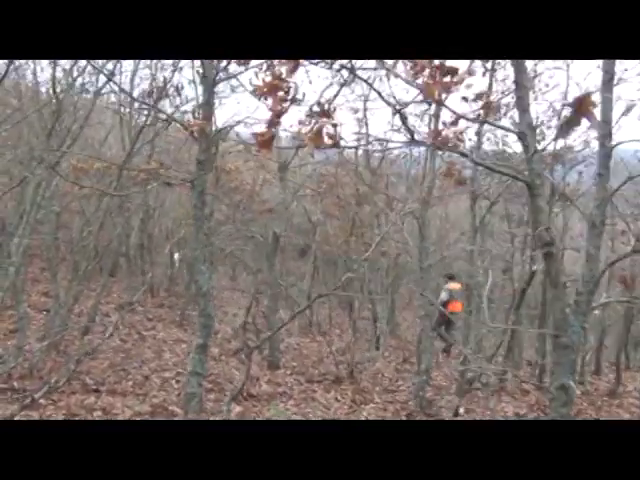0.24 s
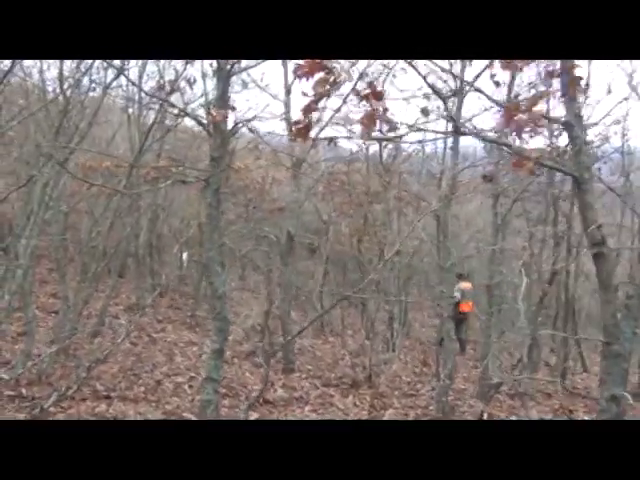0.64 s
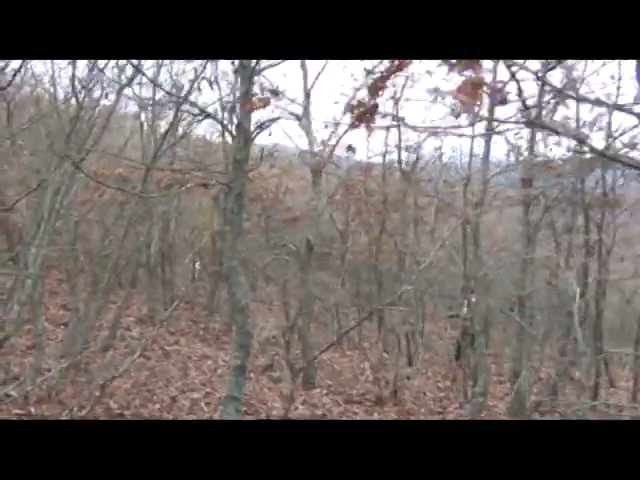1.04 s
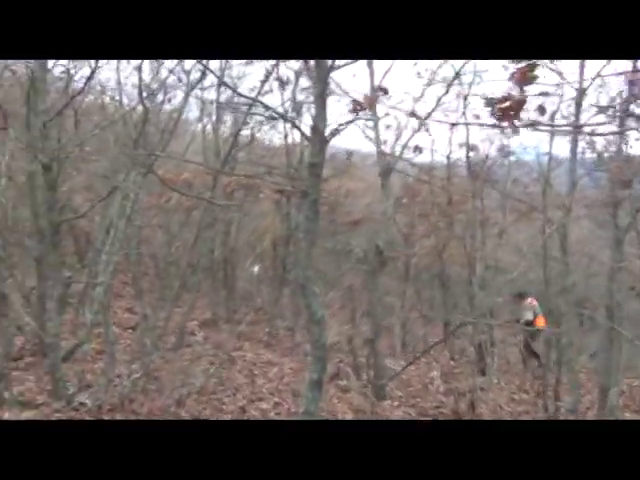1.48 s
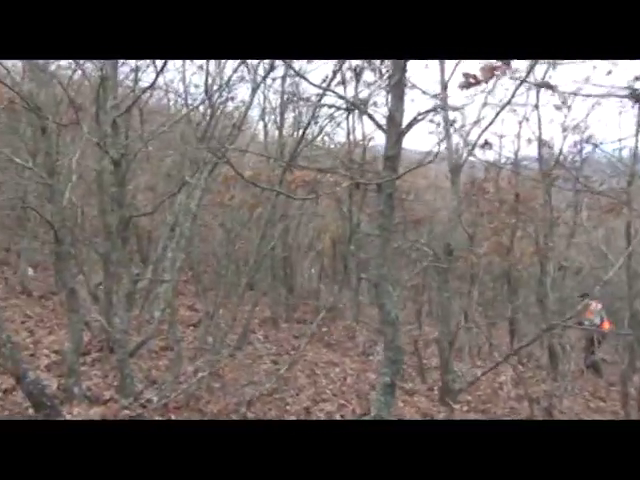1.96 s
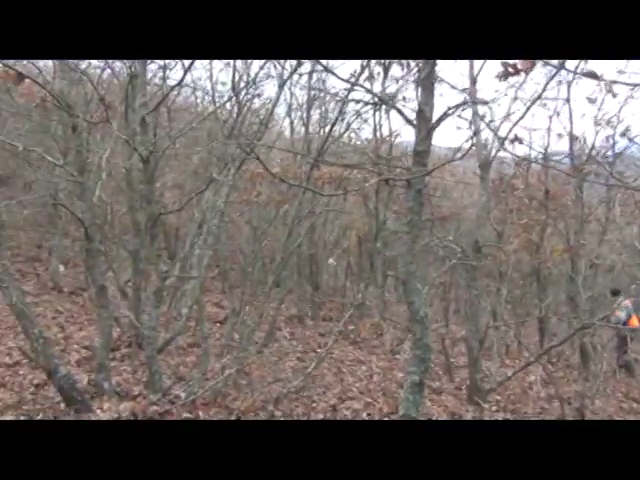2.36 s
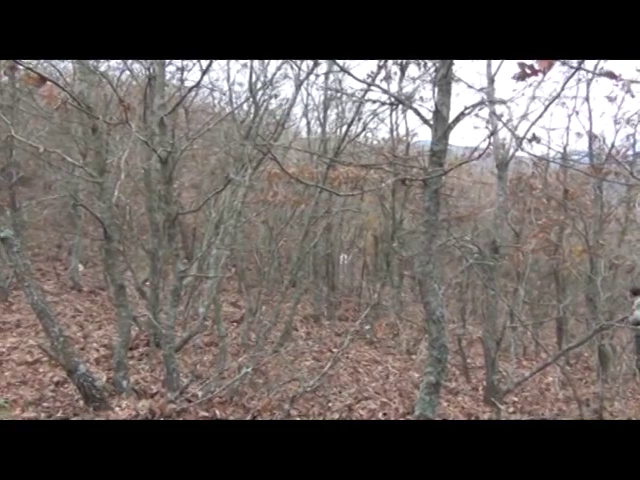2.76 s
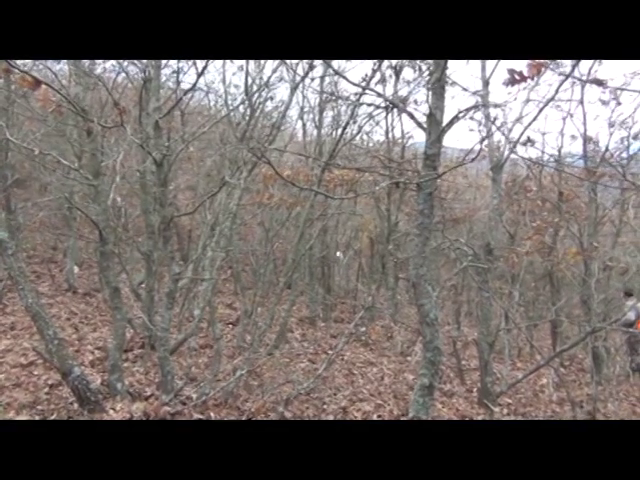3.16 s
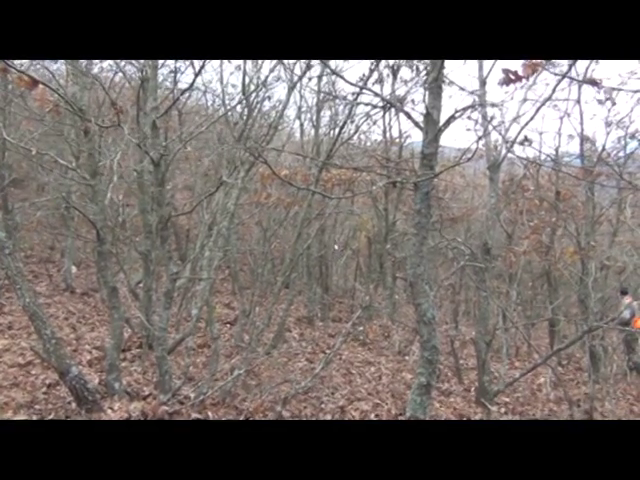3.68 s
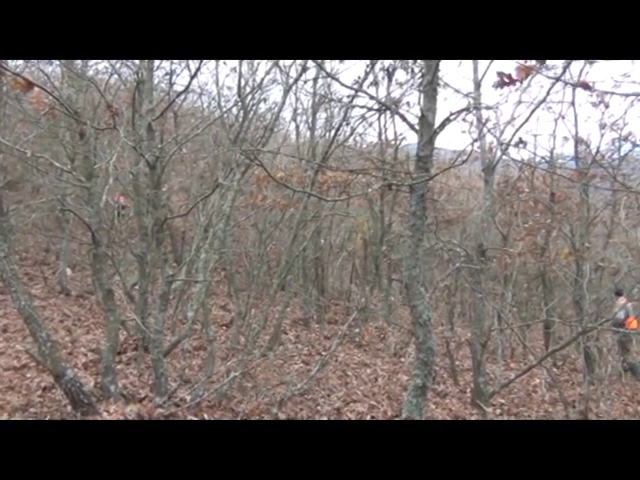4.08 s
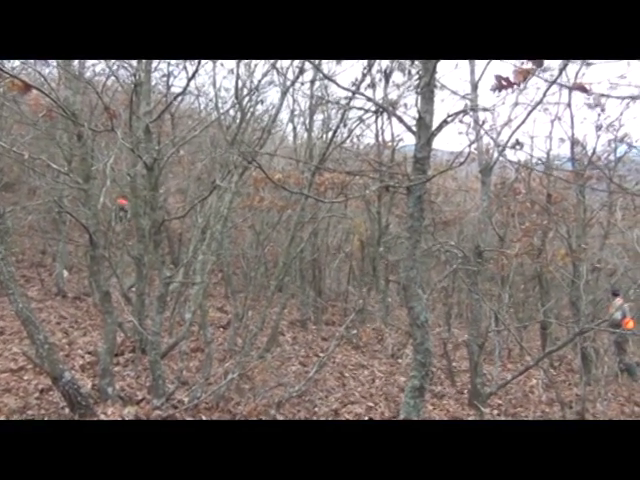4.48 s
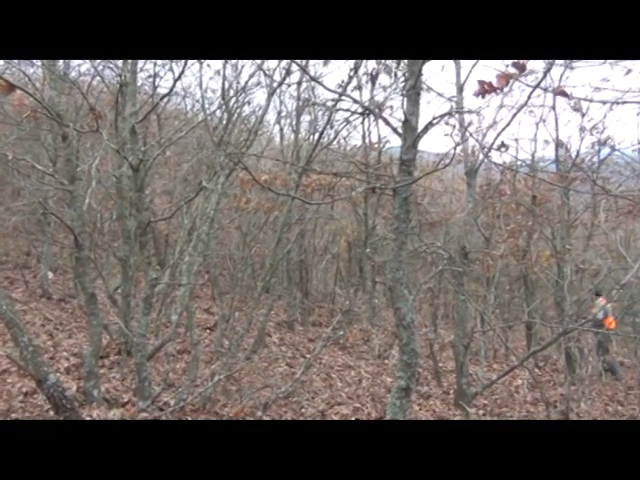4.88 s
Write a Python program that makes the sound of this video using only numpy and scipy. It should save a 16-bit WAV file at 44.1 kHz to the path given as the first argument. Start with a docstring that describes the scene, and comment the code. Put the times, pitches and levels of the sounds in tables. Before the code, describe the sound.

Close footsteps crackle through dry woodland leaves and stop; a distant dog rustles through the brush, its little bells clinking unevenly.

```python
"""Three slow steps crush dry leaves close by, on a wooded slope; twigs snap and a stick creaks.
The walker stands still; further off a dog rustles through the brush, clappers clanking in the two
small bells on its collar. A bird whistles a few notes over a steady hush.
Trunks scatter the snaps, bells and whistles back as echoes."""
import sys
import numpy as np
from scipy import signal
from scipy.fft import rfft, irfft
from scipy.io import wavfile
from scipy.ndimage import uniform_filter1d

SR = 44100
rng = np.random.default_rng(int(sys.argv[2]) if len(sys.argv) > 2 else 0)


def wav_out(sig):
    """Save sig, one row per channel (or a flat mono array), as 16-bit PCM at SR to the path in sys.argv[1]."""
    wavfile.write(sys.argv[1], SR, np.round(np.clip(np.atleast_2d(sig).T, -1, 1) * 32767).astype(np.int16))


N = 226193
TIME = np.arange(N) / SR
# left-right likeness of distant sound: f/Hz, coherence
FAR_COHERENCE = [(40, .95), (100, .93), (300, .8), (700, .68), (1500, .72), (4000, .72), (8000, .66),
                 (14000, .66)]


def steps(crackle_db=-0.55, brittle_db=-8, crunch_db=-5.5, scuff_db=-12, stir_db=-40, stir_end_s=1.97):
    """Top leaves crackle, the packed layer crunches, the sole scuffs, the mould takes the weight."""
    # footfalls: touchdown t/s, load time/s, leaf level/dB, thud level/dB
    footfalls = [(-0.025, 0.34, -24.5, -48), (0.826, 0.28, -20.5, -35), (1.608, 0.3, -25.5, -57)]
    # weight shifts: peak t/s, width/s, thud level/dB, scuff level/dB, leaf level/dB
    shifts = [(0.09, 0.066, -52, -37, -34), (0.446, 0.073, -40.5, -33, -40),
              (0.645, 0.067, -47, -48.5, -38.5), (0.795, 0.037, -36.5, -34, -37),
              (1.22, 0.093, -40, -34.5, -31.5), (1.43, 0.041, -42.5, -43, -41),
              (1.543, 0.039, -38.5, -39, -38), (1.673, 0.033, -36, -40, -28.5)]
    # layer spectra: f/Hz, relative level/dB
    crackle_spectrum = [(60, -66), (1500, -26), (3000, -13), (4500, -1), (6500, -1), (9500, 0), (12000, -5),
                        (14000, -10.5), (16000, -18.5)]
    crunch_spectrum = [(60, -63), (600, -11), (1200, -2.5), (2000, 0), (3200, -2.5), (4500, -8.5),
                       (7000, -3), (15000, -61)]
    scuff_spectrum = [(40, -31), (250, -21), (500, -1.5), (750, 1.5), (1100, 1.5), (1600, -1), (3000, -5),
                      (10000, -57)]
    thud_spectrum = [(20, -30), (70, -21.5), (130, -10), (250, 0), (400, 1.5), (600, 1), (1200, -11.5),
                     (5000, -60)]
    # left-right likeness at the feet: f/Hz, coherence
    near = [(100, .994), (400, .993), (1000, .975), (2000, .95), (4000, .86), (8000, .66), (14000, .66)]
    # trodden leaves spring back until the walker stands still
    stir = gain_of(stir_db) * np.exp(-np.maximum(TIME - stir_end_s, 0) / 0.033)
    crush, press, slide, weight = stir ** 2, stir ** 2, np.zeros(N), np.zeros(N)  # power envelopes
    for s, load_s, leaf_db, thud_db in footfalls:
        load = gain_of(leaf_db) ** 2 * footfall(s, load_s, slope_db_per_s=0)
        press += load
        slide += load * gain_of(scuff_db) ** 2
        crush += gain_of(leaf_db) ** 2 * footfall(s, load_s, slope_db_per_s=15)  # roll on to the toe
        weight += gain_of(thud_db) ** 2 * footfall(s, load_s, slope_db_per_s=-12, release_db_per_s=19.5)
    for s, width_s, thud_db, slide_db, leaf_db in shifts:
        push = swell(s, width_s)
        weight += gain_of(thud_db) ** 2 * push
        slide += gain_of(slide_db) ** 2 * push
        press += gain_of(leaf_db) ** 2 * push
        crush += gain_of(leaf_db) ** 2 * push
    crackle = coloured(grains(per_s=7000, size_db=-0.5, ring_s=0.00017, clump_db=1.58, clump_s=0.024),
                       crackle_spectrum, near)
    brittle = coloured(grains(per_s=300, size_db=2, ring_s=0.0002, clump_db=4, clump_s=0.02),
                       crackle_spectrum, near)  # leaf veins crack singly
    crunch = coloured(grains(per_s=2000, size_db=0.4, ring_s=0.00044, clump_db=0.6, clump_s=0.013),
                      crunch_spectrum, near)
    scuff = coloured(grains(per_s=1200, size_db=2.5, ring_s=0.002, clump_db=1.2, clump_s=0.03),
                     scuff_spectrum, near)
    thud = coloured(grains(per_s=700, size_db=2, ring_s=0.003, clump_db=1, clump_s=0.04),
                    thud_spectrum, near)
    top = (crackle * gain_of(crackle_db) + brittle * gain_of(brittle_db)) * np.sqrt(crush)
    packed = crunch * gain_of(crunch_db) * np.sqrt(press) + scuff * np.sqrt(slide)
    return top * panned(db=3) + packed * panned(db=1.2) + thud * np.sqrt(weight)


def footfall(s, load_s, slope_db_per_s, release_db_per_s=69.5, press_s=0.032, lift_db=4, lift_s=0.0067):
    """Power of one step: pressed in, held on a slope, dropping as the foot lifts, dying away."""
    t = TIME - s
    held_db = slope_db_per_s * (np.clip(t, 0, load_s) - load_s / 2)
    lifted_s = np.maximum(t - load_s, 0)
    fall_db = lift_db * np.minimum(lifted_s / lift_s, 1) + release_db_per_s * lifted_s
    return (np.clip(t / press_s, 0, 1) * gain_of(held_db - fall_db)) ** 2


def grains(per_s, size_db, ring_s, clump_db, clump_s, leaves=16):
    """Clumps of tiny fractures; each leaf answers with its own short burst."""
    window = np.hanning(int(clump_s * SR) + 3)
    clumps = evened(signal.oaconvolve(rng.standard_normal(N), window, "same"))
    sizes = gain_of(size_db * np.minimum(rng.exponential(1, N), 4) + clump_db * np.clip(clumps, -2, 2))
    clicks = sizes * rng.choice([-1, 1], N) * (rng.random(N) < per_s / SR)
    leaf = rng.integers(0, leaves, N)
    bursts = rng.standard_normal((leaves, 2, 512)) * np.exp(-TIME[:512] / ring_s)
    return sum(signal.oaconvolve((clicks * (leaf == k))[None], bursts[k], axes=1)[:, :N]
               for k in range(leaves))


def snaps(splinter_db=-17, splinter_s=0.0021, echo_db=-15):
    """A twig or stalk breaks in a few sharp cycles, then splinters briefly. The bright click at 2.6006 s is no
    twig: it is the clapper's tick on the hardest bell stroke."""
    # breaks (and, at 2.6006 s, the clapper's tick on a hard bell stroke): t/s, level/dB, f/Hz, decay/s
    breaks = [(0.1211, -8, 5080, .0002), (0.165, 0, 4290, .0003), (0.3914, -10, 5940, .0002),
              (0.5651, -13, 7060, .0003), (0.6145, -20, 7210, .0002), (0.7637, -13, 7240, .0004),
              (1.0924, -2, 8700, .0003), (1.1074, -6, 7750, .0002), (1.1194, -6, 6840, .0002),
              (1.3498, -16, 9260, .0002), (1.4406, -18, 9000, .0002), (1.5209, -11.5, 6150, .0003),
              (1.6152, -11.5, 9200, .0003), (1.8547, -7, 6680, .0002), (1.9475, -6, 9430, .0003),
              (1.9849, -6, 8000, .0005), (2.0283, -15, 4370, .0003), (2.6006, -14, 9700, .002),
              (2.8364, -27, 4330, .0003), (3.2311, -25, 3190, .0012), (3.2315, -20, 9300, .0005),
              (3.8028, -26, 7700, .0003), (4.5526, -31, 6380, .0003)]
    out, t = np.zeros((2, N)), TIME[:600]
    for s, db, hz, ring_s in breaks:
        crack = np.sin(2 * np.pi * hz * t) * np.exp(-t / ring_s)
        splinters = rng.standard_normal((2, len(t))) * np.exp(-t / splinter_s)
        add(out, s, gain_of(db) * panned(db=2.3) * (crack + gain_of(splinter_db) * splinters))
    out = band(out, low_hz=1490, high_hz=13400)  # thin stalks radiate no bass
    return out + gain_of(echo_db) * woods(out.mean(0))


def knocks(gain_db=-3, ring_s=0.007, spread=0.3):
    """A soft blow sets off a cluster of quickly damped low resonances."""
    # soles and sticks hitting the ground: t/s, level/dB, f/Hz
    blows = [(0.778, -25, 788), (0.795, -15.5, 765), (0.854, -24, 652), (0.884, -19, 339),
             (0.929, -17, 540), (1.069, -13, 1223), (1.145, -19.5, 533), (1.244, -39, 910),
             (1.519, -46, 540), (1.661, -26, 346), (4.737, -30, 806)]
    out, t = np.zeros(N), TIME[:4000]
    for s, db, hz in blows:
        detune, phase = rng.standard_normal((2, 8, 1))
        ring = np.sin(2 * np.pi * (hz * np.exp(spread * detune) * t + phase)).sum(0)
        knock = ring * t / ring_s * np.exp(-t / ring_s)
        add(out, s, gain_of(db + gain_db) * knock / abs(knock).max())
    return out * panned(db=1.5)


def creak(gain_db=-1, width_hz=230, fade_s=0.011):
    """A boot drags over a stick: stick-slip excites one resonance that sinks and rises."""
    # path of the resonance: t/s, f/Hz, level/dB
    path = [(.375, 1748, -38), (.395, 1646, -28), (.425, 943, -40), (.452, 750, -44), (.485, 1046, -27),
            (.508, 800, -39), (.53, 674, -58)]
    s, hz, db = np.transpose(path)
    hz, db = np.interp(TIME, s, hz), np.interp(TIME, s, db)
    tone = (flutter((N,), width_hz) * np.exp(2j * np.pi * np.cumsum(hz) / SR)).real
    gate = np.exp(-abs(TIME - np.clip(TIME, s[0], s[-1])) / fade_s)
    return evened(tone) * gain_of(db + gain_db) * gate


def collar(echo_db=-8):
    """Two bells heard through the trees, the smaller a little to the right."""
    # clapper strokes: t/s, strength/dB, favoured f/Hz
    large_strokes = [(1.9554, -30, 2122), (1.9868, -24.5, 3100), (2.135, -30, 6550), (2.4214, -36, 2330),
                     (2.5672, -25, 2170), (2.6006, -9.5, 2260), (2.6797, -34, 11300), (2.803, -42, 1600),
                     (2.8225, -37.5, 4200), (2.8988, -39.5, 2420), (3.0382, -36, 2780),
                     (3.0853, -30.5, 2540), (3.1478, -34.5, 11300), (3.152, -31, 2740), (3.2159, -29, 1500),
                     (3.434, -40.5, 2300), (3.5868, -30, 4420), (3.6138, -29.5, 2500),
                     (3.6666, -34.5, 2330), (3.717, -29, 2150), (3.8028, -39, 7400), (3.916, -33, 2060),
                     (3.9903, -45, 6500), (4.0845, -37, 2450), (4.1257, -27.5, 2200), (4.128, -37.5, 11300),
                     (4.139, -22.5, 2160), (4.1764, -34, 2900), (4.215, -35, 4300), (4.4658, -33, 1700),
                     (4.591, -35.5, 1850), (4.6394, -38, 3400), (4.7007, -25.5, 2050), (4.788, -32, 2150),
                     (4.89, -28, 1850), (4.9142, -15, 2060), (5.0265, -27, 4300), (5.079, -38, 1500),
                     (5.1126, -37, 2290)]
    small_strokes = [(0.632, -38.5, 2930), (0.6866, -36.5, 2040), (0.723, -38, 2200), (1.4334, -36.5, 2820),
                     (1.5288, -35.5, 2100), (1.5658, -34, 2200), (1.7515, -36, 2700), (2.0272, -32.5, 1900),
                     (2.0826, -41, 2800), (3.339, -39.5, 1570), (3.898, -33.5, 3930), (4.139, -25.5, 2100),
                     (4.1883, -31, 4800), (4.306, -33, 2000), (4.662, -34.5, 2440), (4.7549, -24.5, 3070)]
    # bell modes: f/Hz, level re partial/dB, t60/s, extra loss once the clapper rests/dB
    large_modes = [(1487.6, 1, 0.12, 5), (1915, -26, 0.31, -4), (2140, -27.5, 0.23, 5),
                   (4053, -13.5, 0.16, -1), (4320, -2, 0.18, 8), (4410, -14.5, 0.2, -6),
                   (7360, -8, 0.18, 27), (7670, -9, 0.18, -13), (7770, -2.5, 0.16, 1),
                   (10900, -11.5, 0.033, 14), (11460, 3, 0.15, 9), (11900, -13, .2, 5),
                   (13450, -14, 0.22, 5)]
    small_modes = [(1567, 4.5, 0.15, 15), (2240, -21.5, 0.19, -5), (4830, -12, 0.25, 30),
                   (4860, -10, 0.55, 4.5), (8270, -5.5, 0.31, 28), (11900, -1, .25, 2)]
    large = bell(large_strokes, large_modes, partial_hz=[1380, 4620, 8300, 11300], gain_db=2.5)
    small = bell(small_strokes, small_modes, partial_hz=[1570, 4850, 8220, 12060], gain_db=1)
    direct = large * panned(db=0.8) + small * panned(db=-2)
    return direct + gain_of(echo_db) * woods(large + small) + woods(rattle())


def bell(strokes, modes, partial_hz, gain_db):
    """Each stroke ticks and rings the modes; the clapper chatters on the wall, then rests on it."""
    rise_s, free_s, settle_s = 0.0012, 0.031, 0.0071
    buzz_db, buzz_hz, buzz_s = -4, 330, 0.065
    tick_db, tick_s = -19, 0.011
    full_swing_db, scatter, vary_db = 3, 0.0042, 2
    loss_db_per_octave, max_loss_db = 14, 29
    out, t = np.zeros(N), TIME[:SR // 3]
    hz, mode_db, t60_s, damp_db = np.transpose(modes)[:, :, None]
    settled = (1 + np.tanh((t - free_s) / settle_s)) / 2
    decay = gain_of(mode_db - 60 * t / t60_s - damp_db * settled)
    chatter = flutter((len(modes), N), buzz_hz)
    nearest_partial = abs(hz - np.array(partial_hz)).argmin(1)
    for s, db, favoured_hz in strokes:
        detune, phase, luck = rng.standard_normal((3, len(modes), 1))
        hardness = gain_of(0.22 * (db - full_swing_db))  # soft strokes swell slower, chatter less
        buzz = hardness * gain_of(buzz_db) * (hz / partial_hz[1]) ** 0.94 * np.exp(-t / buzz_s)
        start = rng.integers(N - len(t))
        rough = (1 + buzz * chatter[:, start:start + len(t)]) / np.sqrt(1 + buzz ** 2)
        tone = (rough * np.exp(2j * np.pi * (hz * (1 + scatter * detune) * t + phase))).real
        ring = tone * decay * (1 - np.exp(-t * hardness / rise_s))
        tick = band(rng.standard_normal(len(t)) * np.exp(-t / tick_s), low_hz=6500, high_hz=14000)
        # the contact spot decides which partials speak
        loss_db = loss_db_per_octave * abs(np.log2(np.array(partial_hz) / favoured_hz))
        partial_db = db - np.minimum(loss_db - loss_db.min(), max_loss_db)
        jitter_db = (vary_db * luck * (mode_db < -3.2))[:, 0]  # weak modes only
        mode_gains = gain_of(partial_db[nearest_partial] + gain_db + jitter_db)
        add(out, s, mode_gains @ ring + hardness * gain_of(db + tick_db) * tick)
    return out


def rattle(level_db=-54, width_hz=90, fade_in_s=1.1):
    """Loose clappers roll in the bells and keep them faintly sounding."""
    # sustained bell tones: f/Hz, relative level/dB
    tones = [(1500, 4.5), (1575, -1.5), (2140, -5), (4350, 1), (4850, -7), (7650, -0.5), (8220, -5),
             (11400, -29)]
    hz, db = np.transpose(tones)[:, :, None]
    ring = (gain_of(db) * flutter((len(hz), N), width_hz) * np.exp(2j * np.pi * hz * TIME)).real.sum(0)
    return gain_of(level_db) * evened(ring) * np.clip(TIME / fade_in_s, 0, 1)


def dog(gain_db=-1):
    """Paws and flanks stir distant leaves; each swish comes quicker than it goes."""
    # swishes: peak t/s, width/s, level/dB
    swishes = [(2.113, 0.053, -46), (2.359, 0.029, -42), (2.45, 0.069, -42), (2.63, 0.066, -39.5),
               (2.79, 0.096, -45.5), (2.912, 0.043, -40.5), (3.204, 0.02, -40), (3.41, 0.024, -47),
               (3.63, 0.17, -42), (3.816, 0.013, -42), (3.876, 0.035, -40), (4.06, 0.11, -46.5),
               (4.166, 0.1, -47.5), (4.465, 0.022, -44.5), (4.72, 0.12, -45.5), (4.967, 0.16, -47.5)]
    # rustle spectrum: f/Hz, relative level/dB
    spectrum = [(700, -28), (1500, -7), (3000, 1.5), (5500, 0), (8000, 1.5), (10500, 3), (12500, -8),
                (16000, -16)]
    rustle = grains(per_s=9000, size_db=4.5, ring_s=0.00052, clump_db=3, clump_s=0.026)
    power = sum(gain_of(db) ** 2 * swell(s, width_s, rise_ratio=0.61) for s, width_s, db in swishes)
    return coloured(rustle, spectrum, FAR_COHERENCE) * np.sqrt(power) * gain_of(gain_db)


def bird(gain_db=1, waver=0.0065, echo_db=-6):
    """Pure whistles: a downward slur, two held steps, a soft fall."""
    # notes: t/s, length/s, first f/Hz, last f/Hz, first level/dB, last level/dB
    notes = [(2.23, 0.098, 2242, 2164, -56, -46), (2.30, 0.095, 2140, 1940, -43, -46),
             (2.375, 0.12, 2205, 2192, -39, -47), (2.485, 0.13, 2608, 2603, -38, -41),
             (2.62, 0.04, 2605, 2460, -34, -48), (2.68, 0.068, 2490, 2414, -50, -51)]
    out = np.zeros(N)
    for s, length_s, first_hz, last_hz, first_db, last_db in notes:
        n = int(length_s * SR)
        wobble = evened(uniform_filter1d(rng.standard_normal(N), size=300))[:n]
        hz = np.linspace(first_hz, last_hz, n) * (1 + waver * wobble)
        envelope = gain_of(np.linspace(first_db, last_db, n) + gain_db) * signal.windows.tukey(n, 0.2)
        add(out, s, envelope * np.sin(2 * np.pi * np.cumsum(hz) / SR))
    return out * panned(db=-8) + gain_of(echo_db) * woods(out)


def woods(x, build_s=0.0054, taps_per_s=2500):
    """Echoes from many trunks: sparse taps, each band dying at its own rate."""
    # echo decay: f/Hz, t60/s
    decay_times = [(200, 0.34), (1500, 0.49), (2500, 0.58), (4500, 0.32), (8000, 0.39), (15000, 0.067)]
    onset = 1 - np.exp(-TIME[:SR] / build_s)
    taps = rng.standard_normal((2, SR)) * (rng.random((2, SR)) < taps_per_s / SR) * onset
    hz, frame_s, frames = signal.stft(taps, SR, nperseg=256)
    decay = gain_of(-60 * frame_s / at_hz(decay_times, hz)[:, None])
    mid, side = signal.istft(frames * decay, SR, nperseg=256)[1]
    tail = np.array([mid + 0.14 * side, mid - 0.49 * side]) / np.linalg.norm(mid)
    return signal.fftconvolve(x[None], tail, axes=1)[:, :N]


def air(level_db=-47.5):
    """Steady hush of the wooded valley."""
    # hush spectrum: f/Hz, relative level/dB
    spectrum = [(15, -45), (30, -16), (60, -8.5), (130, -8), (600, -3), (1200, -4.5), (1500, 1.5),
                (1800, -6.5), (2150, -1.5), (2500, -8.5), (3300, -7.5), (5200, -7.5), (9000, -9.5),
                (16000, -14)]
    return gain_of(level_db) * coloured(rng.standard_normal((2, N)), spectrum, FAR_COHERENCE)


def coloured(pair, spectrum, coherence):
    """Gives two unrelated signals a spectrum and a left-right coherence; mid rms 1."""
    bins_hz = np.fft.rfftfreq(N, 1 / SR)
    a, b = rfft(pair)
    same = at_hz(coherence, bins_hz)
    mid, side = a * np.sqrt(1 + same), b * np.sqrt(1 - same)
    out = irfft(np.array([mid + side, mid - side]) * gain_of(at_hz(spectrum, bins_hz)), N)
    return out / out.mean(0).std()


def flutter(shape, width_hz):
    """Complex narrowband noise, rms 1."""
    real, imaginary = rng.standard_normal((2, *shape))
    z = signal.sosfilt(signal.butter(3, width_hz / 2, fs=SR, output="sos"), real + 1j * imaginary)
    return z / np.sqrt(np.mean(abs(z) ** 2))


def swell(s, width_s, rise_ratio=1):
    """Power hump at time s; rise_ratio is rise time over fall time."""
    return np.exp(-((TIME - s) / (width_s * np.where(TIME < s, rise_ratio, 1))) ** 2)


def band(x, low_hz, high_hz):
    """Gentle band-pass."""
    return signal.sosfilt(signal.butter(2, [low_hz, high_hz], "band", fs=SR, output="sos"), x)


def at_hz(points, hz):
    """Interpolates a table on a log-frequency axis."""
    f, value = np.transpose(points)
    return np.interp(np.log(hz + 1), np.log(f + 1), value)


def gain_of(db):
    """Decibels to amplitude."""
    return 10 ** (np.asarray(db) / 20)


def evened(x):
    """Scales to rms 1."""
    return x / np.sqrt(np.mean(x ** 2) + 1e-20)


def panned(db):
    """Channel gains for a left-minus-right level."""
    return gain_of([db / 2, -db / 2]).reshape(2, -1)


def add(mix, s, sound):
    """Mixes a sound in at time s."""
    part = mix[..., max(round(s * SR), 0):][..., :sound.shape[-1]]
    part += sound[..., :part.shape[-1]]


def scene():
    """Walker, dog, bird and hush in stereo."""
    return steps() + snaps() + knocks() + creak() + dog() + collar() + bird() + air()


def record(dry, edge_hz=16050):
    """Steep low-pass."""
    lowpass = signal.firwin(511, edge_hz, window=("kaiser", 9), fs=SR)
    return signal.oaconvolve(dry, lowpass[None], "same")


dry = scene()
out = record(dry)
wav_out(out)
```